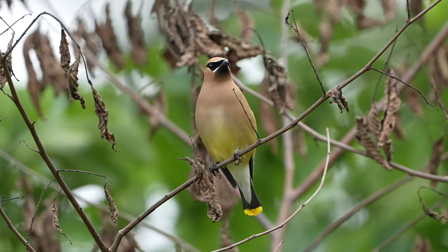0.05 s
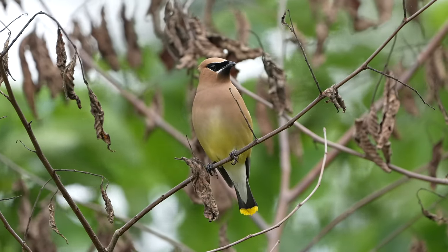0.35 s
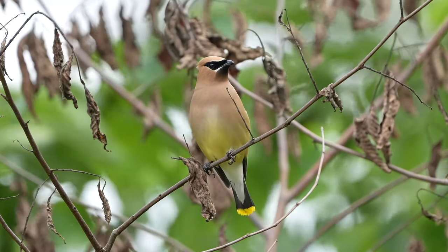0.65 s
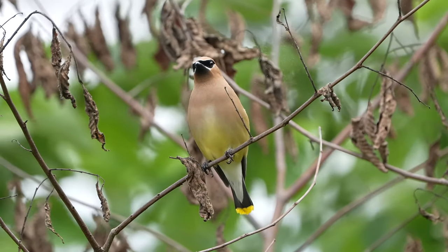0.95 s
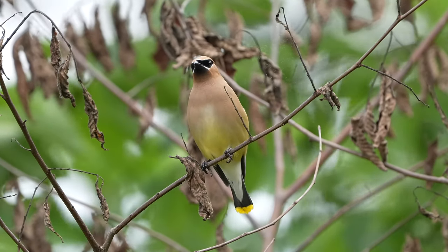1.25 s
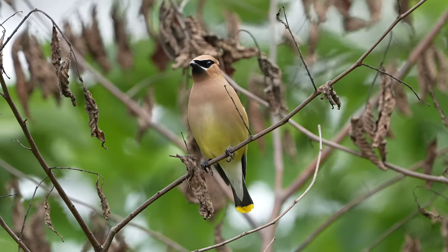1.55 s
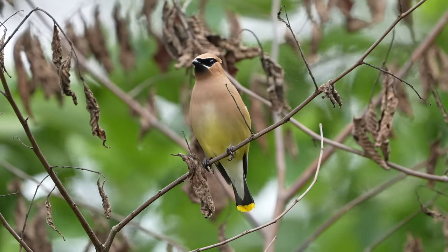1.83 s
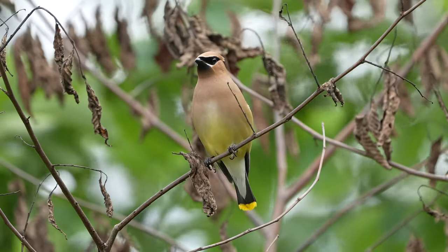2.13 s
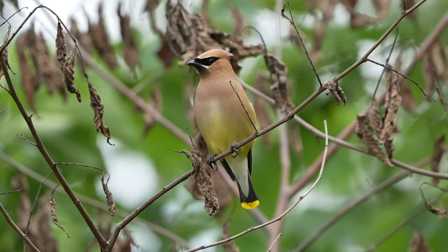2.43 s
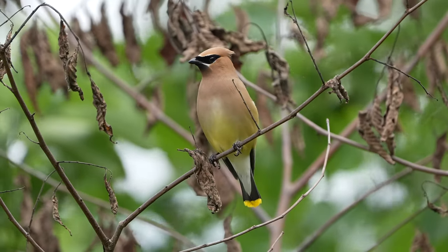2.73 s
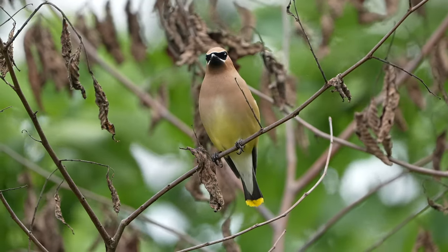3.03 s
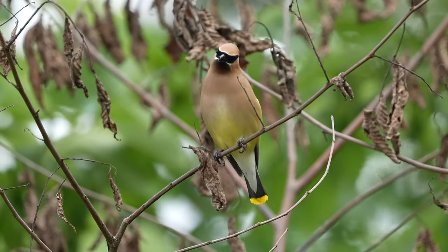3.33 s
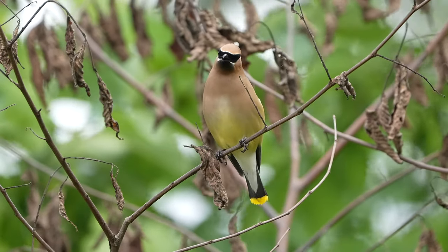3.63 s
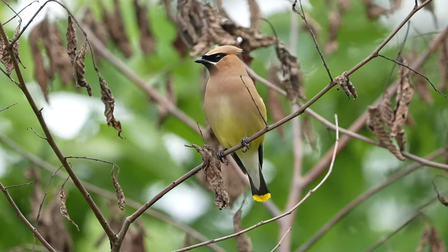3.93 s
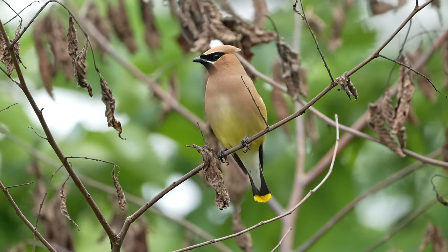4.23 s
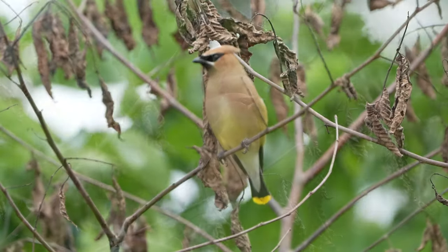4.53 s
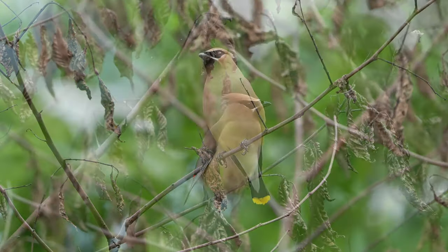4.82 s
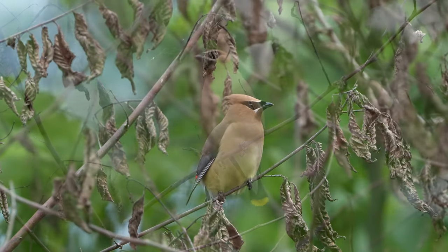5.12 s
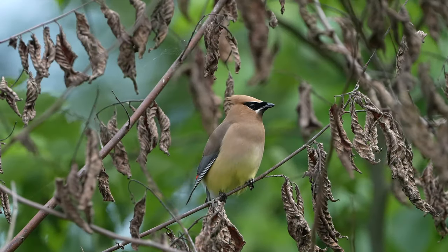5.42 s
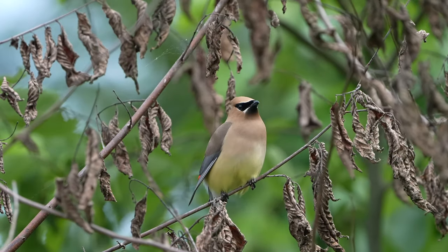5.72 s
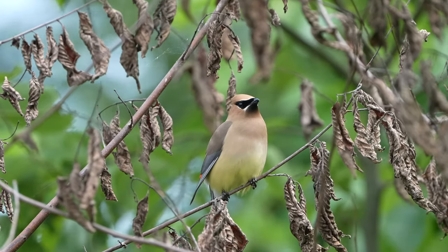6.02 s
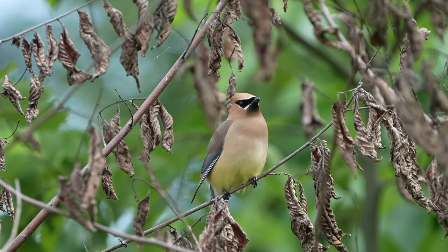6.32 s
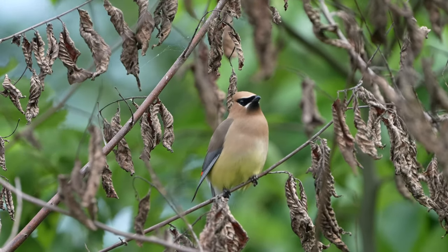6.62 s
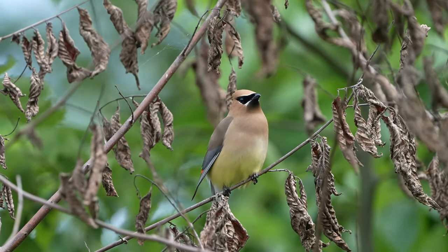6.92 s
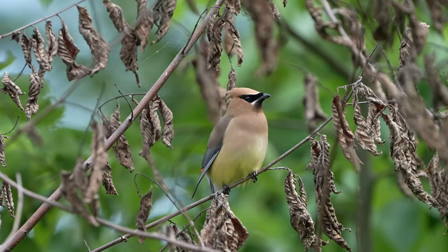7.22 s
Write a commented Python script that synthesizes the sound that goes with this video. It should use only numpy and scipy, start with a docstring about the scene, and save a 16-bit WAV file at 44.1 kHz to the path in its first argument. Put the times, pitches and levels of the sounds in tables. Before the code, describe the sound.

Wind buffets the microphone in a hissing wood, ending in a loud low rumble, as a songbird on a branch whistles thinly.

```python
"""A wood near distant traffic. Leaves and traffic make a steady hiss. A waxwing on a branch gives three
thin, arched whistles, the first breaking into a trill, and a faint flat one; its flock calls around it.
Two brief toots and a songbird's slurs come from far off. Wind eddies rumble on the microphone ports,
first in short sputtering buffets, after which hiss and birds dip and creep back, then in one long gust
over a duller hiss."""
import sys
import numpy as np
from scipy import signal
from scipy.fft import rfft, irfft
from scipy.io import wavfile
from scipy.ndimage import uniform_filter1d

SR = 44100
rng = np.random.default_rng(int(sys.argv[2]) if len(sys.argv) > 2 else 0)


def unload_wav(signal):
    """Save mono or channel-first audio to the path in sys.argv[1] as 16-bit WAV at rate SR, clipped to [-1, 1]."""
    wavfile.write(
        sys.argv[1],
        SR,
        np.round(np.clip(np.atleast_2d(signal).T, -1, 1) * 32767).astype(np.int16),
    )


N = 328986
TIME = np.arange(N) / SR
BIN_HZ = np.maximum(np.arange(N // 2 + 1) * SR / N, 1)

# Hiss spectra. Each row: frequency in Hz, relative density in dB.
BRIGHT_HISS_DB = [(180, -14), (300, -11.5), (519, -12), (612, -7.5), (812, -5.5), (974, -1.5), (1270, -2.5),
                  (1580, -5.5), (2390, -2.5), (3200, -6), (4000, -5), (6670, -7), (9450, -9.5),
                  (13200, -18), (14500, -21), (15800, -34)]
DULL_HISS_DB = [(290, -8), (500, -11), (760, -7.5), (904, -4), (1040, -1), (1520, -8), (2520, -7),
                (3270, -14.5), (4370, -12), (4760, -14), (5580, -13.5), (10100, -17.5), (13300, -25),
                (15800, -32)]
# Hiss balance. Each row: frequency in Hz, left minus right in dB.
BRIGHT_LEAN_DB = [(900, -2), (1400, 3.5), (2000, -5.5), (3200, 0.5), (5000, 0), (7500, -2.5), (11000, -5),
                  (14500, -0.5)]
DULL_LEAN_DB = [(900, -1.5), (1500, 2.5), (2050, -9), (2600, -2.5), (5000, -0.5), (7500, -4.5),
                (11000, -10), (14500, -2)]
# Hiss width. Each row: frequency in Hz, left-right correlation.
HISS_CORRELATION = [(300, 0.16), (700, 0.59), (1100, 0.53), (1700, -0.29), (2700, -0.27), (6000, -0.0026),
                    (15000, 0.054)]
# Spectra: slow wind swell, quicker churn, midrange noise, single puff.
# Each row: frequency in Hz, relative density in dB.
SWELL_SPECTRUM_DB = [(12, -34), (22, -6.5), (45, -1.5), (75, -1), (120, -3.5), (200, -14), (320, -34),
                     (600, -74)]
CHURN_SPECTRUM_DB = [(40, -34), (80, -5), (130, -3.5), (200, -3), (280, -7), (400, -16.5), (600, -26.5),
                     (1000, -41), (2000, -76)]
MIDRANGE_SPECTRUM_DB = [(90, -22), (160, -11), (270, 1.5), (420, 0.5), (600, 3.5), (900, -1), (1200, -5.5),
                        (1700, -15), (2500, -25), (3500, -37), (5000, -66)]
PUFF_SPECTRUM_DB = [(90, -18), (160, -7), (290, 0.5), (450, -4.5), (680, 3), (900, -2), (1200, -6.5),
                    (1700, -16), (2500, -28), (3500, -34), (5000, -66)]
# Wind phase between the ports. Each row: frequency in Hz, phase in radians at lead = 1.
PORT_PHASE_RAD = [(30, 0.3), (60, 0.22), (130, 0.92), (290, 1.58), (600, 1.82), (2000, 1.78)]
# Gusts. Each row: start, rise, hold and decay time in seconds, relative level in dB,
# churn over swell in dB.
GUSTS = [(-.4, 0.63, .65, 0.19, -44.5, -6.5), (0.901, 0.23, 0.58, 0.29, -39, 3.5),
         (2.032, 0.28, 0.27, 0.081, -42, -4.5), (2.667, 0.16, 0.049, 0.065, -38.5, 5.5),
         (2.883, .17, 0.29, 0.18, -38.5, 2.5), (3.64, 0.19, 0.085, 0.096, -49.5, -13),
         (4.217, 0.088, 0.076, 0.056, -49, 0.5), (4.71, .43, .4, .35, -21.3, 4.2),
         (5.0, 1.2, .31, .41, -21.2, 2.6)]
# Lulls between eddies. Each row: centre and half width in seconds, depth in dB (negative lifts).
LULLS = [(0.866, 0.035, 9.5), (2.12, 0.029, 9), (2.41, 0.052, 4), (2.723, 0.043, -2), (3.6, 0.04, 9),
         (4.2, 0.065, 4), (5.425, 0.019, 5), (5.69, 0.02, 1.5), (6.155, 0.023, 8), (6.383, 0.017, 3)]
# Midrange noise. The first row fills out the background hiss for a third of a second; the rest are wind.
# Each row: start and hold in seconds, relative level in dB.
MIDRANGE_SPELLS = [(0, .34, -46), (1.281, 0.6, -44.5), (2.778, 0.031, -35.5), (2.816, 0.11, -41),
                   (3.002, 0.033, -29.5), (3.078, 0.09, -33), (3.226, .19, -38), (3.486, 0.028, -51),
                   (3.738, 0.043, -42), (4.327, 0.049, -50)]
# Slow eddies. Each row: centre in seconds, relative level in dB.
BUMPS = [(0.018, -45), (.42, -45), (.45, -40), (.53, -49), (.71, -48), (0.807, -48), (0.949, -38),
         (1.11, -40.5), (1.15, -50), (1.645, -42), (2.345, -52), (2.47, -46.5), (2.56, -45), (2.62, -45),
         (2.653, -43.5), (2.757, -40.5), (3.719, -46), (3.777, -41.5), (3.899, -49.5), (3.965, -51.5),
         (4.308, -49), (4.355, -46.5), (4.42, -49), (4.93, -36), (5.085, -28.5), (5.201, -31), (5.328, -23),
         (5.557, -25), (5.82, -28), (5.914, -28), (6.022, -26), (6.07, -27.5), (6.21, -20), (6.41, -25),
         (6.483, -24), (6.68, -32), (6.825, -27), (7.383, -36)]
# Hard puffs. Each row: start in seconds, relative peak in dB, speed ratio to a usual eddy.
PUFFS = [(1.144, -27, 0.8), (1.255, -26.5, 0.69), (1.631, -29, 0.83), (1.776, -28.5, 0.78),
         (1.808, -23.5, 0.83), (1.974, -31, 0.84), (2.784, -25, 0.84), (2.804, -27, 1.1),
         (2.929, -32, 0.89), (2.956, -31, 1.1), (3.006, -24, 1.03), (3.018, -23, 1.18), (3.078, -18.5, 1.2),
         (3.112, -18, 1.1), (3.138, -25, 1.1), (3.243, -24, 0.78), (3.298, -24, 0.74), (3.328, -21.5, 0.96),
         (3.352, -21.5, .85), (3.372, -21, 1), (3.438, -23.5, 0.81), (3.495, -30, 0.82),
         (3.508, -29.5, 0.93), (3.532, -31, 0.87), (3.703, -29.5, 0.72), (3.781, -29.5, 0.92),
         (4.363, -31, 0.87)]
# Dips of hiss and birds after hard buffets. Each row: start in seconds, depth in dB.
DIPS = [(.37, 3), (.46, 3.5), (1.16, 6), (1.38, 5), (1.45, 7), (1.625, 8), (1.725, 10.5), (1.86, 9.5),
        (2.815, 11), (3.01, 16.5), (3.13, 17), (3.2, 18.5), (6.201, 2.5), (7.419, 1.5)]
# Far sounds: thin flock notes, low toots, a twitter of pips.
# Each row: centre and length in seconds, top pitch in Hz, end droop in Hz, relative level in dB.
FLOCK_NOTES = [(.35, .17, 6830, 120, -52.5), (1.10, .18, 7000, 150, -53.5), (1.612, .055, 8560, 120, -45.5),
               (1.678, .045, 8540, 60, -50.5), (1.793, .05, 8550, 60, -44.5), (1.952, .055, 8280, 60, -49),
               (3.695, .15, 8770, 80, -48), (4.8, .15, 6730, 40, -52)]
TOOTS = [(2.262, .022, 975, 60, -42.5), (6.965, .03, 1005, 40, -40)]
PIPS = [(5.546, .015, 8150, 250, -49.5), (5.571, 0.016, 8540, 400, -41), (5.595, .015, 8220, 250, -48),
        (5.617, .02, 8470, 300, -40.5), (5.644, 0.018, 8050, 250, -50), (5.661, .019, 8460, 250, -42)]
# Waxwing whistles. Each row: start and length in seconds, top pitch in Hz, climb in Hz and in seconds,
# droop in Hz and in seconds, release in seconds, relative level in dB.
WHISTLES = [(2.365, .595, 7385, 702, .24, 200, 0.24, 0.086, -38.5),
            (3.02, 0.207, 6845, 90, .18, 10, .03, .025, -37.5),
            (3.235, .48, 7390, 470, .205, 330, .27, 0.064, -33.5),
            (4.30, 0.495, 7530, 886, 0.21, 310, .135, 0.095, -38.3)]
# Brief dips in whistle loudness; at 4.51 and 4.655 s its echo interferes.
# Each row: centre and half width in seconds, depth in dB.
WHISTLE_DIPS = [(3.14, .02, 4), (4.51, 0.029, 3), (4.655, 0.022, 6), (4.738, .009, 7)]
# Songbird slurs. Each row: centre and length in seconds, pitch in Hz, glide in Hz per second,
# relative level in dB.
SLURS = [(6.24, .05, 2405, 500, -45.5), (6.283, .08, 2570, 900, -41.5), (6.541, .175, 2545, 1900, -37.3),
         (7.0, .15, 2560, -2600, -50)]

BRIGHT_END_S, DULL_START_S, HISS_FADE_S = 5.06, 4.764, .47
CRACKS_S = (2.603, 2.737, 2.797)   # downward cracks in the first whistle


def from_db(db):
    """Decibels to gain."""
    return 10 ** (np.asarray(db) / 20)


def unit_rms(x):
    """Scale to rms 1."""
    return x / np.sqrt(np.mean(x ** 2) + 1e-20)


def unit_in_band(x, low_hz, high_hz):
    """Scale stereo so its mid has rms 1 in a band."""
    band = irfft(rfft(x.mean(axis=0)) * ((BIN_HZ > low_hz) & (BIN_HZ < high_hz)), N)
    return x / band.std()


def steadied(x, samples):
    """Hold the running rms of stereo noise at 1."""
    return x / np.sqrt(uniform_filter1d(np.mean(x ** 2, axis=0), size=samples) + 1e-12)


def over_hz(table):
    """Table value at each bin, on a log frequency axis."""
    hz, values = np.transpose(table)
    return np.interp(np.log(BIN_HZ), np.log(hz), values)


def drift(rate_hz):
    """Low-passed noise, rms 1."""
    return unit_rms(irfft(rfft(rng.standard_normal(N)) / (1 + (BIN_HZ / rate_hz) ** 2), N))


def bell(centre_s, width_s):
    """Gaussian of height 1."""
    return np.exp(-np.minimum(((TIME - centre_s) / width_s) ** 2, 20))


def envelope(start_s, rise_s, hold_s, decay_s):
    """Quadratic rise, hold, exponential decay."""
    age_s = TIME - start_s
    rise = np.clip(age_s / rise_s, 0, 1) ** 2
    return rise * np.exp(-np.clip((age_s - rise_s - hold_s) / decay_s, 0, 30))


def easing(rows):
    """Gain with a smooth notch per row."""
    return from_db(-sum(depth_db * bell(centre_s, width_s) for centre_s, width_s, depth_db in rows))


def hiss(spectrum_db, lean_db):
    """Leaves and far traffic: diffuse noise, treble leaning right."""
    mid, side = rfft(rng.standard_normal((2, N)))
    correlation = np.clip(over_hz(HISS_CORRELATION), -1, 1)
    pair = np.sqrt(1 + correlation) * mid + np.sqrt(1 - correlation) * side * [[1], [-1]]
    balance = from_db(over_hz(lean_db) * np.array([[1], [-1]]) / 2)
    balance /= np.sqrt(np.mean(balance ** 2, axis=0))
    return unit_in_band(irfft(pair * balance * from_db(over_hz(spectrum_db)), N), 3800, 6300)


def gusts(calm_db=-56.5, calm_churn_db=-13):
    """Wind strength and churn-to-swell ratio; the strongest gust dominates."""
    power = from_db(calm_db) ** 2
    churn = power * from_db(calm_churn_db)
    for start_s, rise_s, hold_s, decay_s, level_db, churn_db in GUSTS:
        shape = envelope(start_s, rise_s, hold_s, decay_s)
        gust_power = (from_db(level_db) * shape) ** 2
        power = power + gust_power
        churn = churn + gust_power * from_db(churn_db) * shape ** .4   # most churn at the peak
    return np.sqrt(power), churn / power


def eddies(lump_db, rate_hz):
    """Turbulent pressure: noise in lumps."""
    return rng.standard_normal(N) * from_db(lump_db * np.clip(drift(rate_hz), -2, 2))


def at_ports(pressure, spectrum_db, lead, own_db=None):
    """Eddies reach the two microphone ports out of phase; own_db adds separate noise at each."""
    if own_db is not None:
        pressure = pressure + from_db(own_db) * rng.standard_normal((2, N))
    turn = np.exp(.5j * lead * over_hz(PORT_PHASE_RAD) * np.array([[1], [-1]]))
    return irfft(rfft(pressure) * from_db(over_hz(spectrum_db)) * turn, N)


def rumble(strength, churn_ratio):
    """Low swell under a lumpy churn that grows with wind speed."""
    swell = at_ports(rng.standard_normal(N), SWELL_SPECTRUM_DB, lead=-1.04, own_db=-11.5)
    churn = at_ports(eddies(lump_db=4.5, rate_hz=81), CHURN_SPECTRUM_DB, lead=-1, own_db=-11.5)
    wind = steadied(unit_rms(swell) + churn_ratio * unit_rms(churn), SR // 12)
    return strength * unit_in_band(wind, 30, 300)


def midrange_noise(strength, gust_share_db=-30.5):
    """Fuller low-midrange hiss at the start; later, wind sputter in spells and faintly in gusts."""
    spells = [from_db(level_db) * envelope(start_s, rise_s=.0069, hold_s=hold_s, decay_s=.033)
              for start_s, hold_s, level_db in MIDRANGE_SPELLS]
    level = np.max(spells + [from_db(gust_share_db) * strength], axis=0)
    noise = at_ports(eddies(lump_db=5.5, rate_hz=120), MIDRANGE_SPECTRUM_DB, lead=.94, own_db=-6)
    return level * unit_rms(noise)


def bumps(width_s=.012):
    """Slow eddies pass the ports as short, dull swells."""
    level = sum(from_db(level_db) * bell(centre_s, width_s) for centre_s, level_db in BUMPS)
    noise = at_ports(rng.standard_normal(N), CHURN_SPECTRUM_DB, lead=-.79)
    return level * steadied(noise, SR // 40)


def arched_notes(rows, waver_hz):
    """Notes that swell and fade as the pitch rises and falls."""
    out, jitter_hz = np.zeros(N), waver_hz * drift(80)
    for centre_s, length_s, top_hz, droop_hz, level_db in rows:
        on = np.abs(TIME - centre_s) < length_s / 2
        place = (TIME[on] - centre_s) / (length_s / 2)
        phase = 2 * np.pi * np.cumsum(top_hz - droop_hz * place ** 2 + jitter_hz[on]) / SR
        out[on] += np.sqrt(2) * from_db(level_db) * np.cos(np.pi / 2 * place) * np.sin(phase)
    return out


def panned(right_db):
    """Channel gains with mean 1."""
    gains = from_db(np.array([[-right_db], [right_db]]) / 2)
    return gains / gains.mean()


def foliage(x, t60_s, wet_db):
    """Leaves and trunks scatter a short, diffuse stereo echo."""
    echo = rng.standard_normal((2, SR)) * from_db(-60 * TIME[:SR] / t60_s)
    echo /= np.sqrt(np.sum(echo ** 2, axis=1, keepdims=True))
    return from_db(wet_db) * signal.fftconvolve(x[None], echo, axes=1)[:, :N]


def far_ahead(x, wet_db, direct_db=0):
    """Far calls from ahead trail off among the trees."""
    return from_db(direct_db) * x * panned(right_db=2) + foliage(x, t60_s=.85, wet_db=wet_db)


def dips(rows, attack_s=.0096, rebound_db=4.5, rebound_s=.1, creep_s=2.93):
    """Gain drops abruptly, rebounds partway, creeps back; the deepest dip counts."""
    loss_db = np.zeros(N)
    for start_s, depth_db in rows:
        age_s = np.maximum(TIME - start_s, 0)
        regained_db = rebound_db * (1 - np.exp(-np.minimum((age_s / rebound_s) ** 2, 20)))
        shape = np.minimum(age_s / attack_s, 1) * np.exp(-age_s / creep_s)
        loss_db = np.maximum(loss_db, shape * (depth_db - regained_db))
    return from_db(-loss_db)


def puffs(rise_s=.00098, decay_s=.0055):
    """Strong eddies hit the ports and die in milliseconds; faster ones sound higher."""
    noise = at_ports(rng.standard_normal(N), PUFF_SPECTRUM_DB, lead=1, own_db=-5.5)
    noise = steadied(noise, SR // 100)
    out = np.zeros((2, N))
    for start_s, peak_db, speed in PUFFS:
        on = np.flatnonzero((TIME > start_s) & (TIME < start_s + 10 * decay_s))
        age_s = TIME[on] - start_s
        shape = np.minimum(age_s / rise_s, 1) * np.exp(-np.maximum(age_s - 2 * rise_s, 0) / decay_s)
        eddy = np.array([np.interp(start_s + speed * age_s, TIME, port) for port in noise])
        out[:, on] += from_db(peak_db) * shape * eddy
    return out


def bird_tone(pitch_hz, waver_hz, wander_hz=6.97, flutter_db=1.2):
    """Near-pure tone; pitch wanders, level trembles."""
    phase = 2 * np.pi * np.cumsum(pitch_hz + wander_hz * drift(9.34) + waver_hz * drift(69)) / SR
    return np.sqrt(2) * from_db(flutter_db * drift(41)) * np.sin(phase)


def waxwing(attack_s=.027, swell_db=15, swell_s=.27):
    """Near bird, right: whistles swell, climb and droop. The first trills; the loudest sags briefly."""
    song = np.zeros(N)
    sag_hz = 60 * bell(centre_s=3.53, width_s=.0277)
    for k, row in enumerate(WHISTLES):
        start_s, length_s, top_hz, climb_hz, climb_s, droop_hz, droop_s, release_s, level_db = row
        age_s, left_s = TIME - start_s, start_s + length_s - TIME
        pitch_hz = top_hz - climb_hz * np.clip(1 - age_s / climb_s, 0, 1) ** 2
        pitch_hz -= droop_hz * np.clip(1 - left_s / droop_s, 0, 1) ** 2
        voice = trill(pitch_hz) if k == 0 else bird_tone(pitch_hz - sag_hz, waver_hz=9)
        gate = np.sin(np.pi / 2 * np.clip(np.minimum(age_s / attack_s, left_s / release_s), 0, 1)) ** 2
        onset_db = -swell_db * np.clip(1 - age_s / swell_s, 0, 1) ** 1.7
        song += gate * from_db(level_db + onset_db) * voice
    song *= easing(WHISTLE_DIPS)
    return song * panned(right_db=11) + foliage(song, t60_s=.55, wet_db=-13)


def trill(pitch_hz, start_s=2.635, rate_hz=32.2, flip_hz=310, crack_hz=400, rasp_width_hz=450):
    """Pitch cracks down and flips up rapidly; the tone frays into a rasp and fades."""
    age_s = TIME - start_s
    cracks = sum(bell(centre_s, width_s=.006) for centre_s in CRACKS_S)
    flips = np.clip(age_s / .03, 0, 1) * np.clip(3 * np.cos(2 * np.pi * rate_hz * age_s) - .5, 0, 1)
    clear = bird_tone(pitch_hz + flip_hz * flips - crack_hz * cracks, waver_hz=14)
    clear *= from_db(-5.5 * flips - 8 * cracks)   # the voice thins on each
    phase = 2 * np.pi * np.cumsum(pitch_hz) / SR
    rasp = drift(rasp_width_hz) * np.cos(phase) + drift(rasp_width_hz) * np.sin(phase)
    rasp_share = .62 * np.clip(age_s / .2, 0, 1)
    fade = from_db(-16 * np.maximum(TIME - CRACKS_S[0], 0))   # 16 dB per second
    return fade * (np.sqrt(1 - rasp_share) * clear + np.sqrt(rasp_share) * rasp)


def songbird(lead_s=.00021):
    """Straight glides from far left; the left port gets them louder and sooner."""
    song = np.zeros(N)
    for centre_s, length_s, pitch_hz, glide_hz_per_s, level_db in SLURS:
        offset_s = np.clip(TIME - centre_s, -length_s / 2, length_s / 2)
        voice = bird_tone(pitch_hz + glide_hz_per_s * offset_s, waver_hz=11)
        song += from_db(level_db) * np.cos(np.pi * offset_s / length_s) * voice
    ports = np.array([song, np.interp(TIME - lead_s, TIME, song)])
    return ports * panned(right_db=-7) + foliage(song, t60_s=.85, wet_db=-8)


def scene():
    """Wind, toots and birds; bright hiss gives way to dull."""
    strength, churn_ratio = gusts()
    strength *= easing(LULLS)
    slow_wind = from_db(.83) * rumble(strength, churn_ratio) + from_db(7) * bumps()
    midrange = from_db(.5) * midrange_noise(strength) + from_db(-2.5) * puffs()
    toots = far_ahead(arched_notes(TOOTS, waver_hz=55), wet_db=-13)

    fade_out = np.clip((BRIGHT_END_S - TIME) / HISS_FADE_S, 0, 1)
    early = from_db(-45) * fade_out * hiss(BRIGHT_HISS_DB, BRIGHT_LEAN_DB)
    early += waxwing()
    early += far_ahead(arched_notes(FLOCK_NOTES, waver_hz=80.5), wet_db=0, direct_db=-.5)
    early *= dips([row for row in DIPS if row[0] < DULL_START_S])

    fade_in = np.clip((TIME - DULL_START_S) / HISS_FADE_S, 0, 1)
    late = from_db(-49.5) * fade_in * hiss(DULL_HISS_DB, DULL_LEAN_DB)
    late += far_ahead(arched_notes(PIPS, waver_hz=60), wet_db=-5)
    late += songbird()
    late *= dips([row for row in DIPS if row[0] >= DULL_START_S])
    return early + late + toots + slow_wind + midrange


def record(dry):
    """Soft-clip wind peaks, then low-pass steeply."""
    ceiling, cutoff_hz = .6, 15800
    rounded = ceiling * np.tanh(dry / ceiling)
    return irfft(rfft(rounded) / np.sqrt(1 + (BIN_HZ / cutoff_hz) ** 400), N)


dry = scene()
out = record(dry)
unload_wav(out)
```